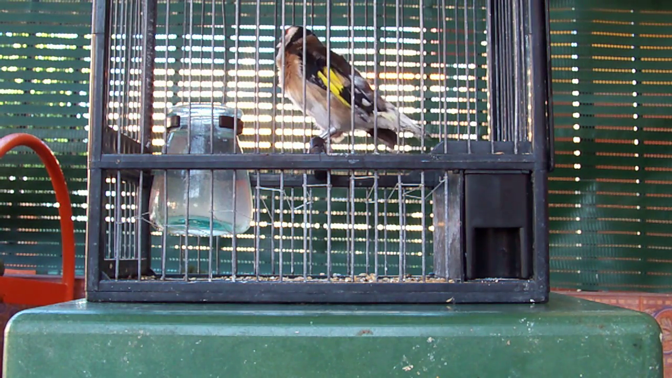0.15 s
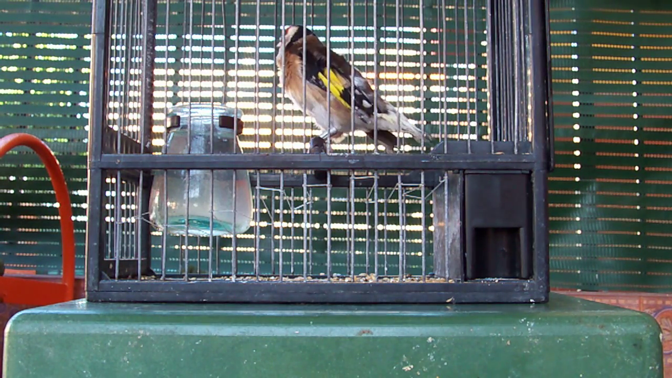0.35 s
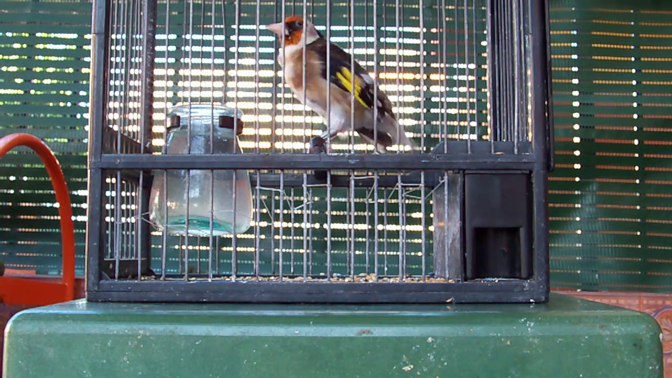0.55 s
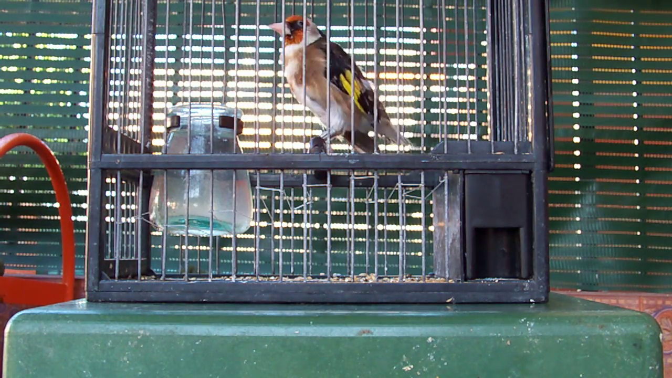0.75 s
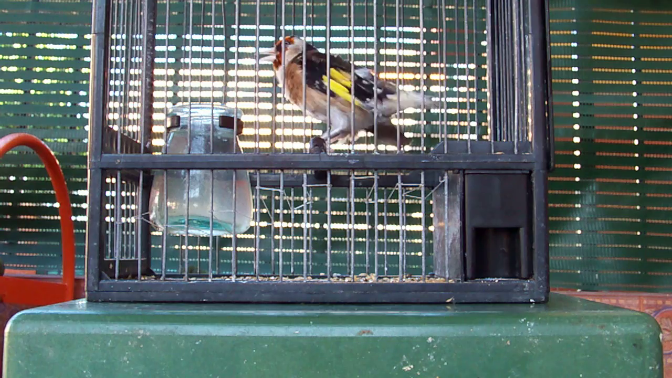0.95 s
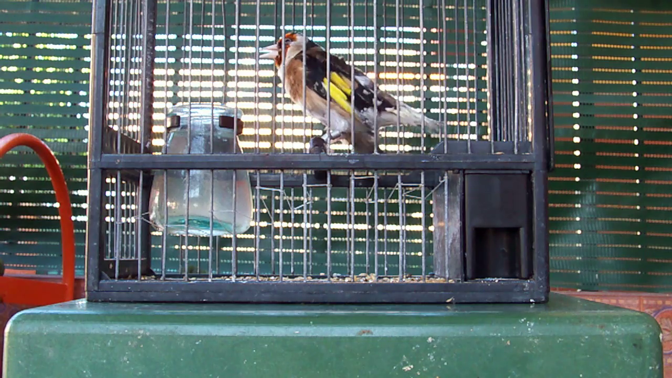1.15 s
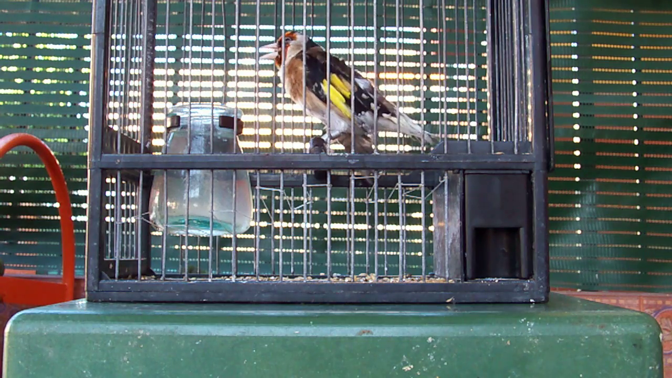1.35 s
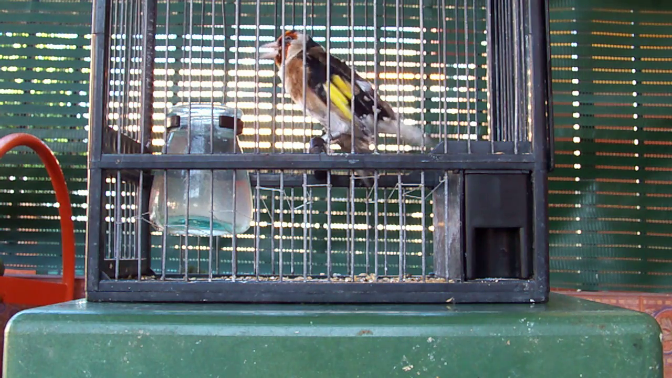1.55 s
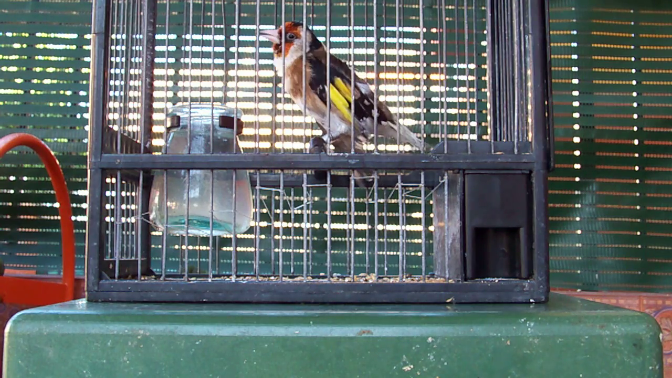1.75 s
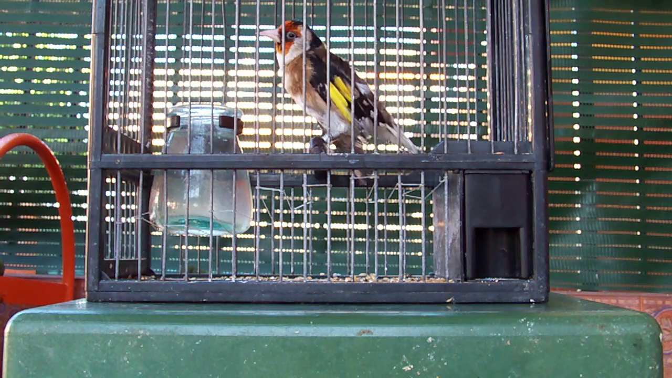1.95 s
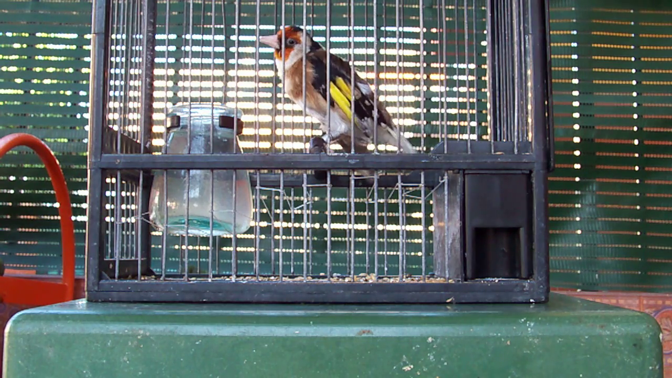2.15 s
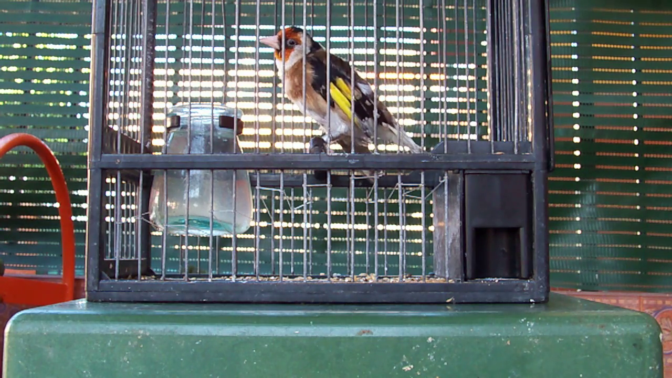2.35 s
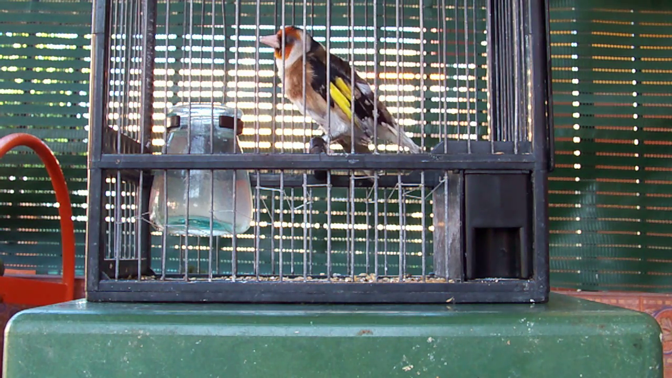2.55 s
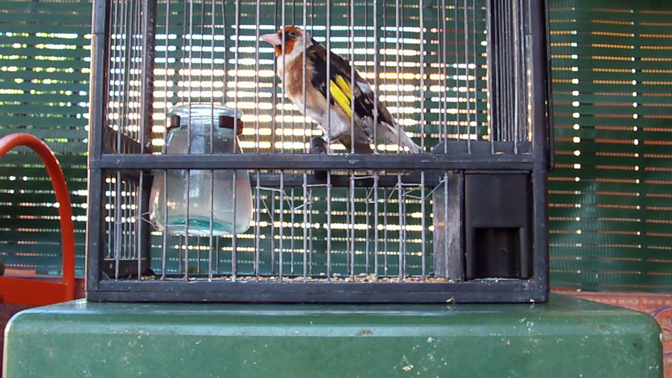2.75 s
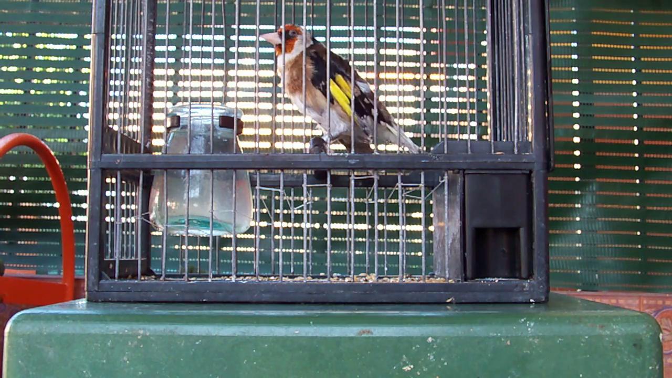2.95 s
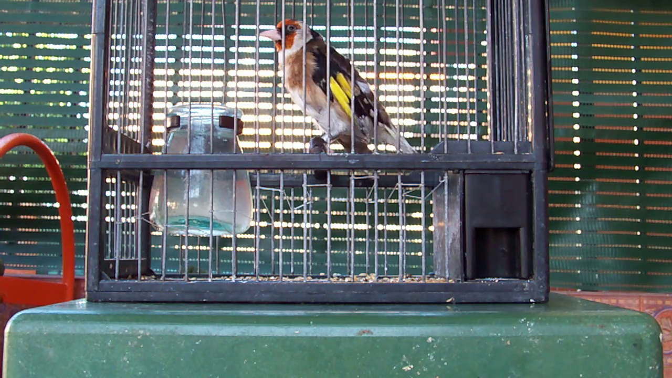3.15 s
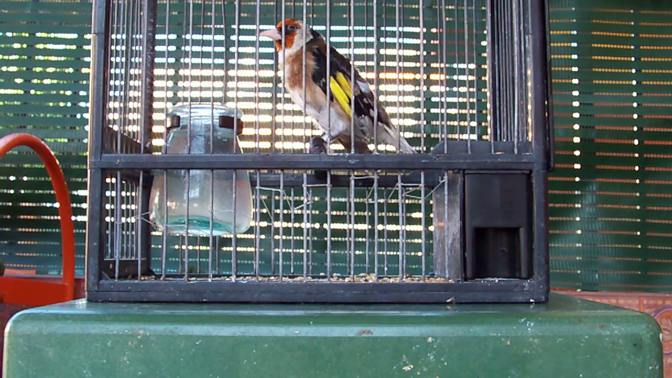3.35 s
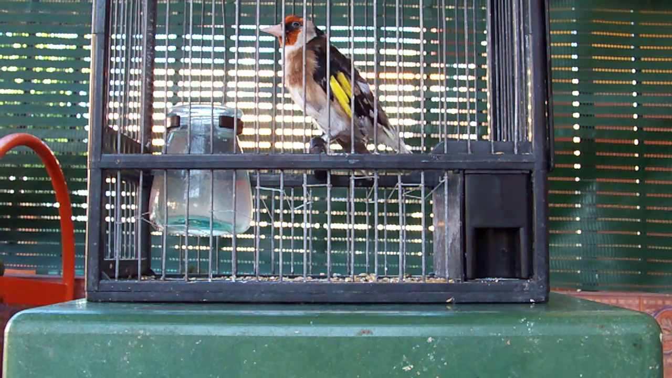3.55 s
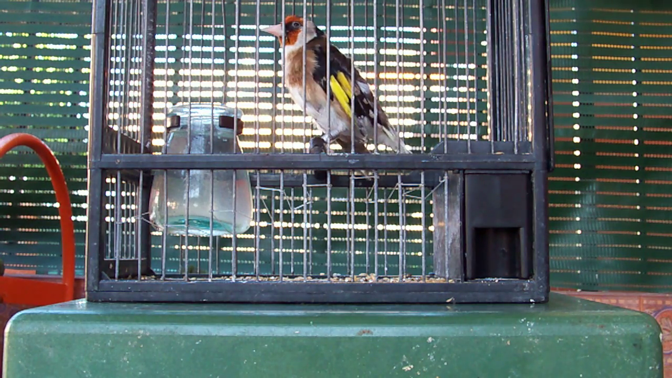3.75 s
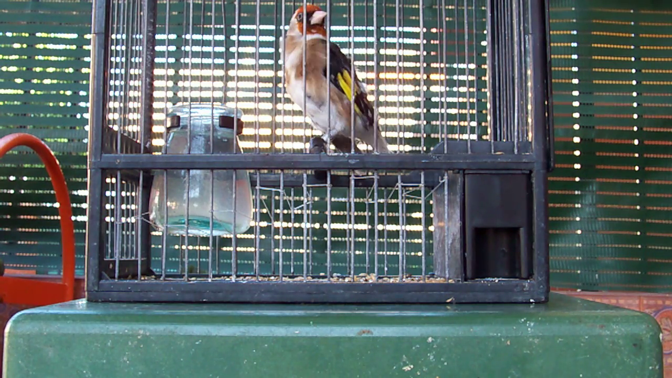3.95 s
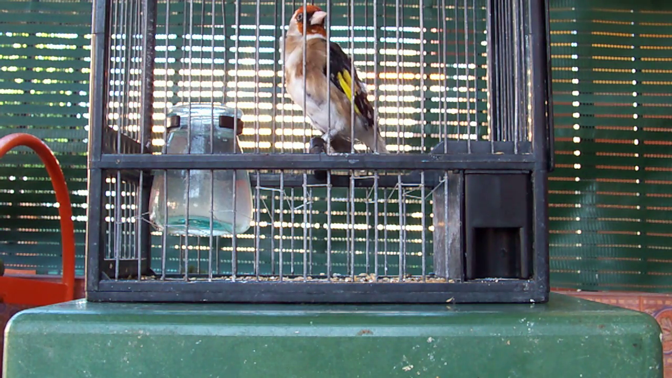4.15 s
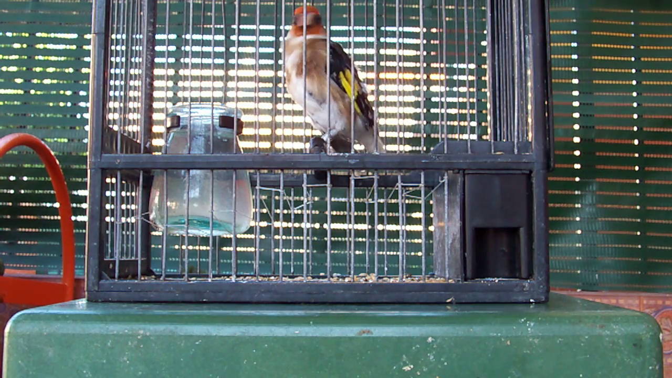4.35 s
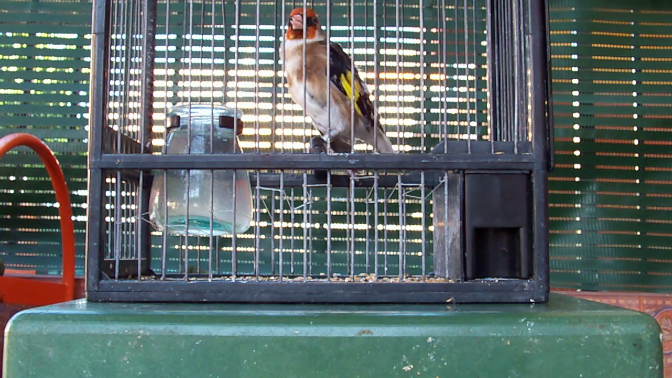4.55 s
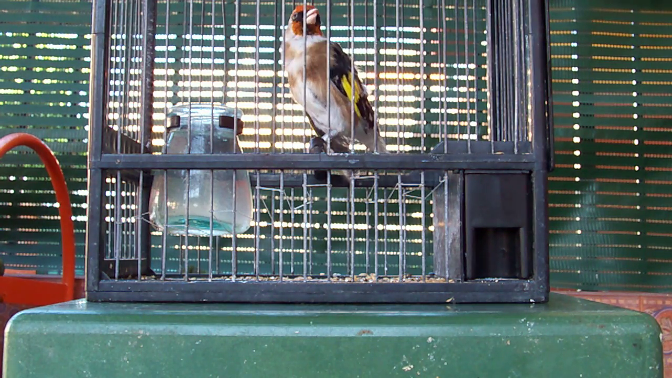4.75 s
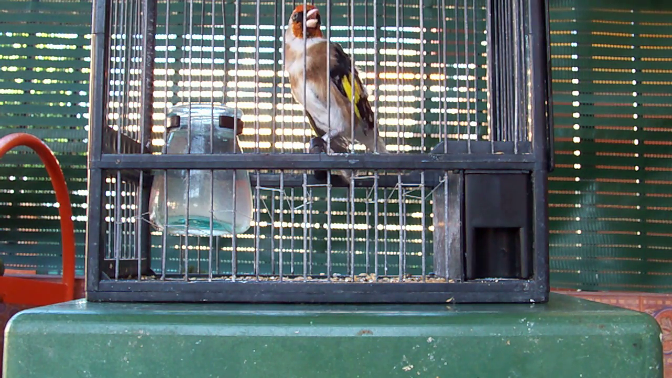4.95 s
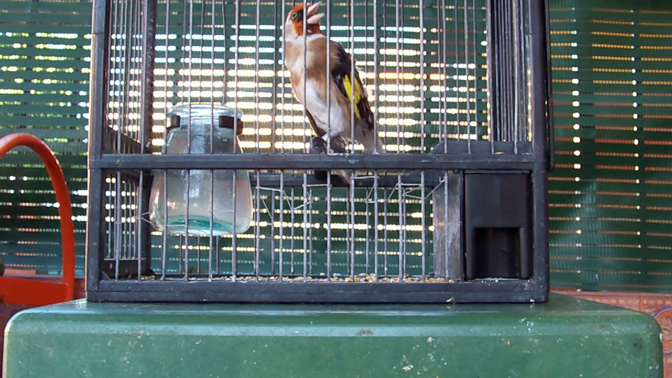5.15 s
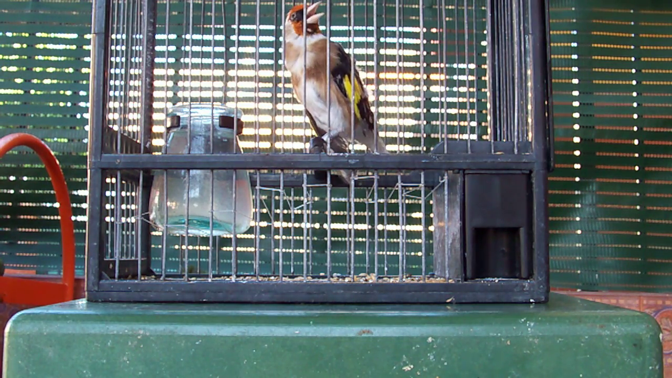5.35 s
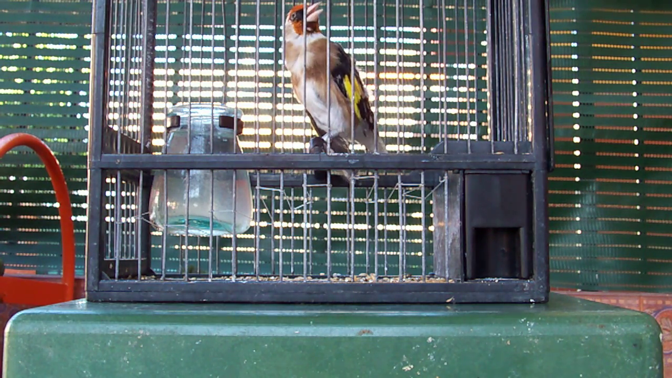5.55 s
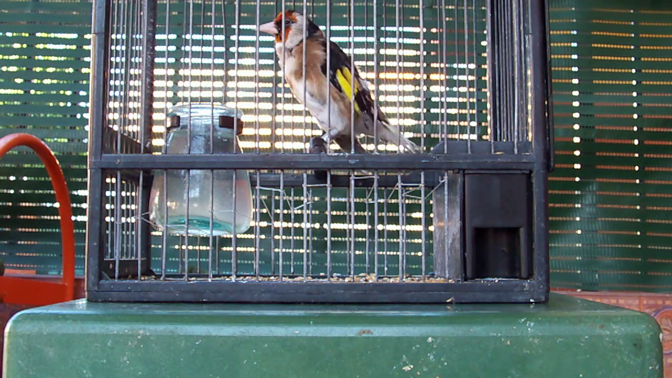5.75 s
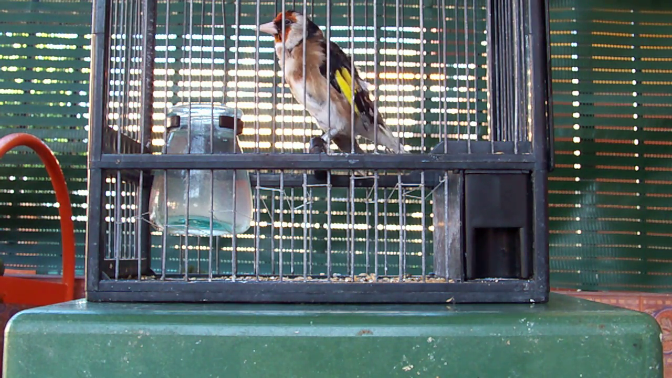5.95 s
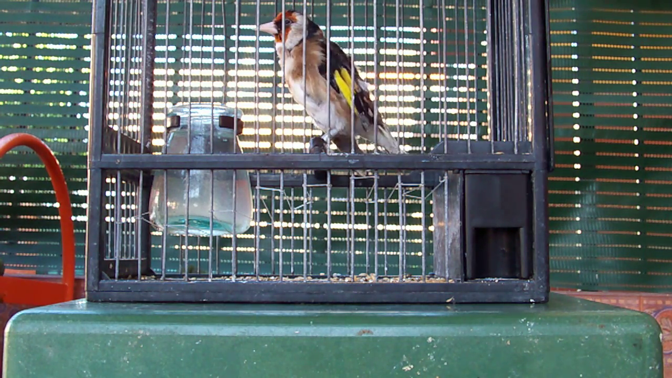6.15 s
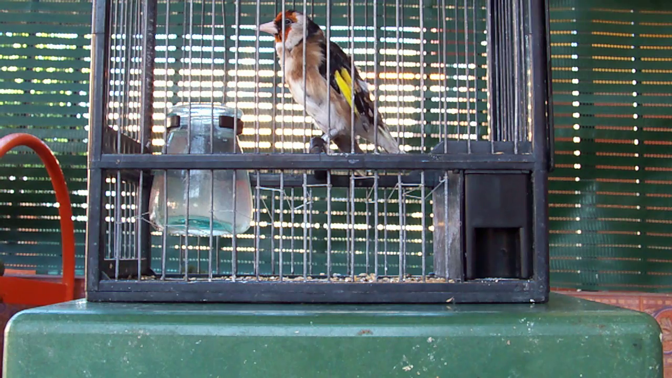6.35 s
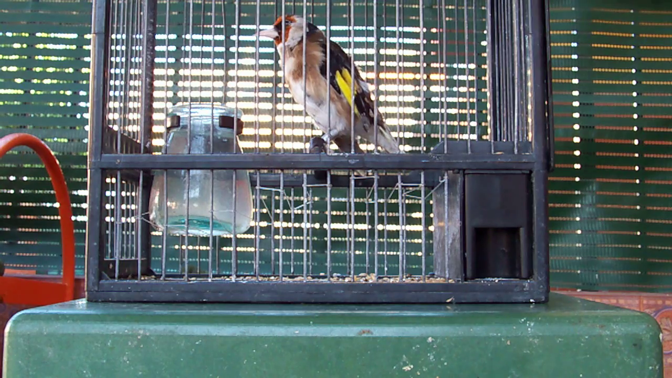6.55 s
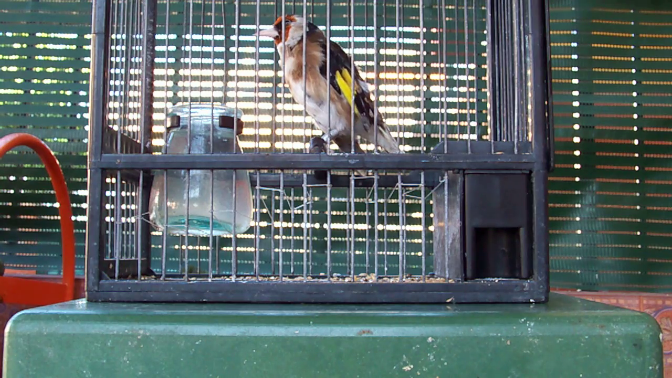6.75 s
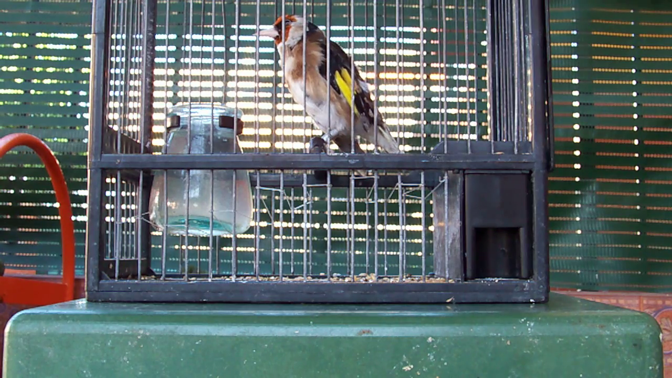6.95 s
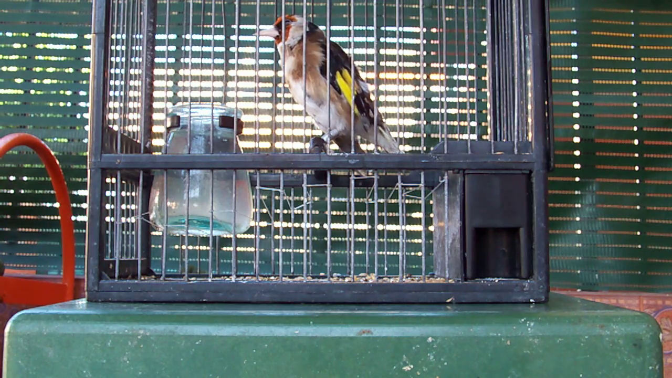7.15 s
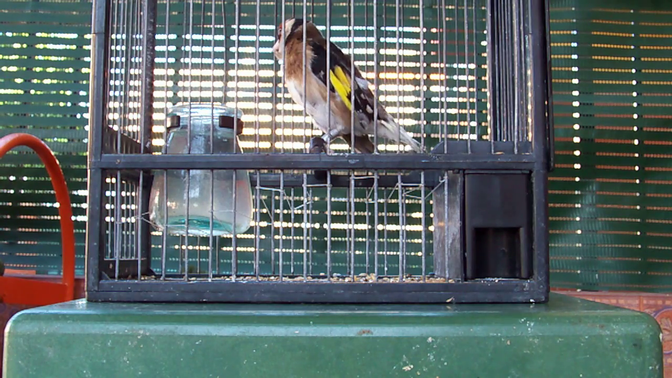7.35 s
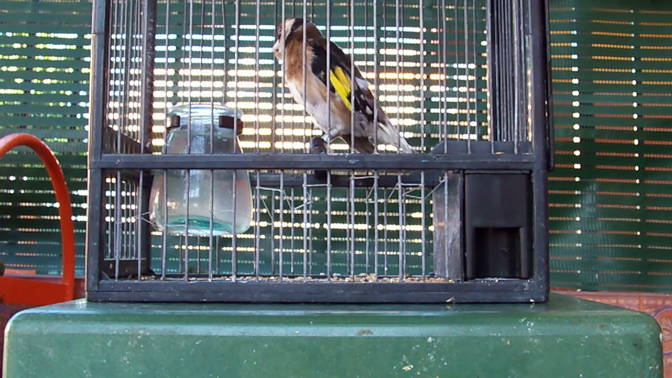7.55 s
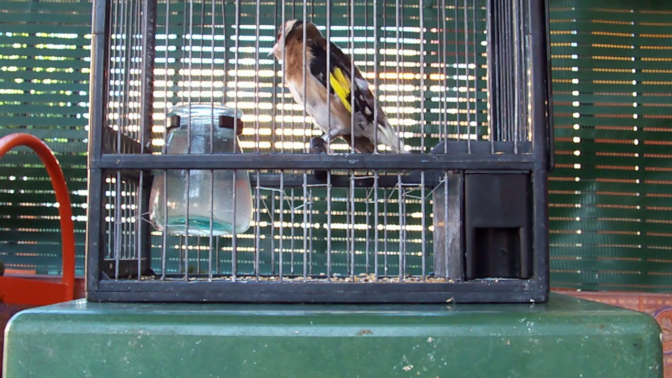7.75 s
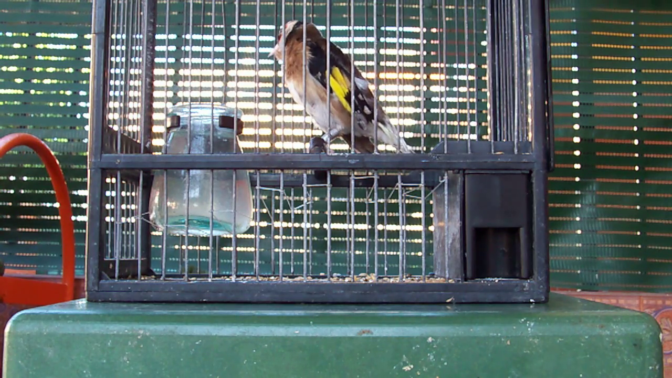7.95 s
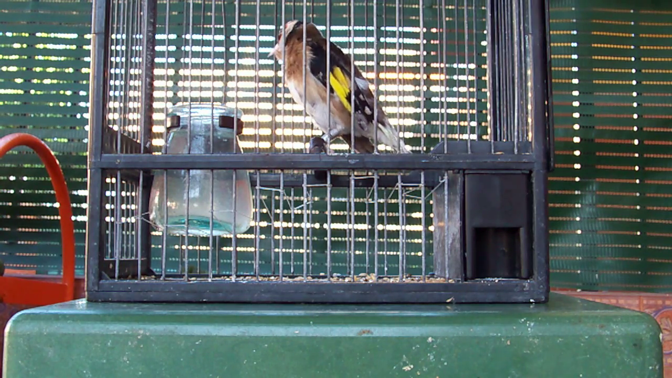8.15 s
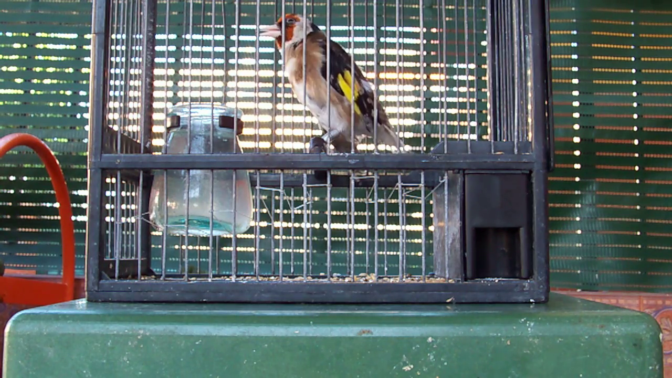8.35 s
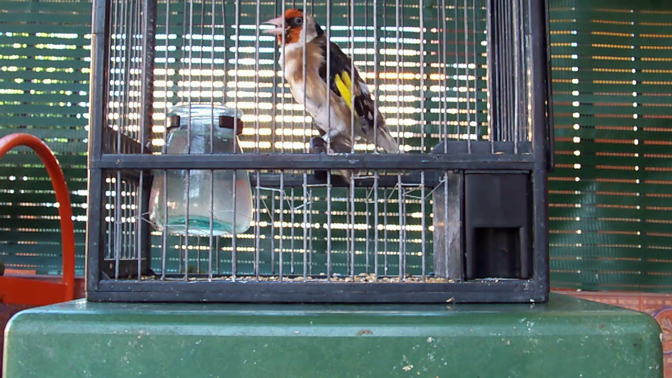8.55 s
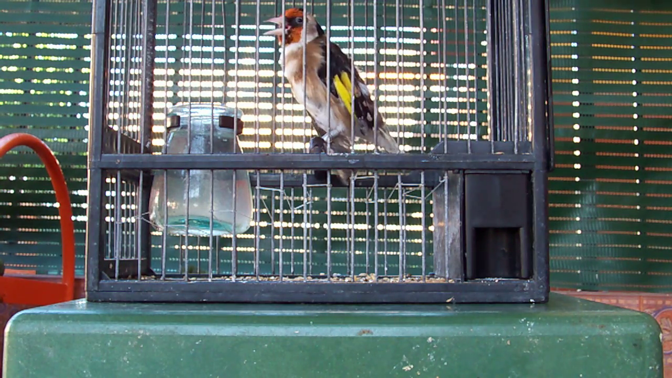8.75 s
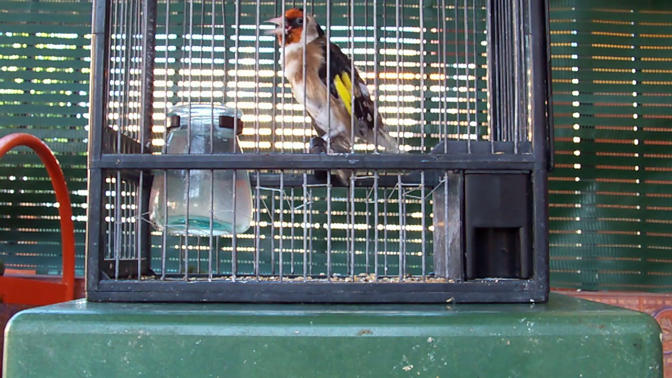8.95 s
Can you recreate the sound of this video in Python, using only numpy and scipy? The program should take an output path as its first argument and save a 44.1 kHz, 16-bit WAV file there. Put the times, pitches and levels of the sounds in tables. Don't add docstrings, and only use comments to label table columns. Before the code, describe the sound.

A low, soft hum of distant traffic and a fan runs throughout, its deepest rumble swelling slowly. From 0 to 1 s, faint far birds give rising calls and thin pipes while a dove moans low; the near finch adds tiny chips at 0.2 and 0.5 s. At 0.87 s it bursts into loud, piercing twitter until about 1.8 s: a sharp opener, then quick falling, scooping and climbing glides, about six cycles a second, mostly 3 to 8 kHz. Hard echoes and a short tail follow. From 1.8 to 3.5 s, distant pipes, a long wavering whistle and a buzzy trill end in a downward slide around 3.2 to 3.5 s. A second burst runs from 4.5 to 5.65 s, pitch sagging slightly. Quiet hum and faint dove moans fill 5.7 to 8.2 s. A third burst starts at 8.25 s and continues to the end near 9.1 s. Loud notes sound slightly gritty.

```python
import sys
import numpy as np
from scipy import signal
from scipy.fft import rfft, irfft
from scipy.io import wavfile
from scipy.ndimage import uniform_filter1d

SR = 44100
rng = np.random.default_rng(int(sys.argv[2]) if len(sys.argv) > 2 else 0)


def gain_from_db(level_db):
    decades = np.asarray(level_db, float) / 20
    return 10 ** decades


def unload_audio(sound):
    columns = np.transpose(np.atleast_2d(sound))
    steps = np.round(np.clip(columns, -1, 1) * 32767)
    wavfile.write(sys.argv[1], SR, steps.astype(np.int16))


N = 401310


def evened(x):
    return x / np.sqrt(np.mean(x ** 2) + 1e-20)


def read(points, hz):
    table_hz, value = np.transpose(points)
    return np.interp(np.log(hz + 1), np.log(table_hz + 1), value)


def add(mix, start_s, sound):
    part = mix[..., round(start_s * SR):][..., :sound.shape[-1]]
    part += sound[..., :part.shape[-1]]


def drift(count, size):
    noise = rng.standard_normal(count)
    return evened(uniform_filter1d(uniform_filter1d(noise, size), size))


def coloured(x, points):
    return irfft(rfft(x) * gain_from_db(read(points, np.fft.rfftfreq(N, 1 / SR))), N)


# pitch_hz, level_db
OCTAVE = [(2000, -6), (2300, 8), (2620, 16), (2820, 8), (2960, -20), (3400, -34), (4000, -40), (6000, -48)]
# pitch_hz, left_minus_right_db
HEAD_SHADE = [(3000, -2), (3900, 2), (4400, 2.5), (4800, -1.5), (5500, -3), (7000, -1)]
# pitch_hz, left_lead_rad
HEAD_TURN = [(0, 0), (1550, -0.06), (2760, 0.54), (3960, 0), (4220, -0.45), (4650, -1.89), (5600, -0.8),
             (5940, -1.3), (6370, -1.5), (7060, 0.5), (8100, 0.15)]
# time_s, treble_tilt_db_per_octave, room_share_db
POSTURE = [(.1, -3.7, 6), (.9, -2.35, -1), (1.1, -3.5, 4), (1.3, -3, 4.5), (1.5, -1, 5), (1.8, 0.6, 1),
           (4.5, -3.05, -1.5), (4.9, -0.36, -1), (5.2, 2, 1.5), (5.6, 0.5, -3.2), (8.3, 0.5, -0.94),
           (8.7, 2.5, 0.2), (9.1, 3.3, 2)]


def note(shape, mark_s, stretch, level_db, pitch_factor, pan_db):
    shape_s, hz, db = np.transpose(shape)
    t = np.arange(shape_s[0] * stretch, shape_s[-1] * stretch, 1 / SR) / stretch
    hz = uniform_filter1d(pitch_factor * np.interp(t, shape_s, hz), size=60, mode="nearest")
    db = uniform_filter1d(np.interp(t, shape_s, db), size=40, mode="nearest")
    db = db + level_db + 0.42 * drift(len(t), size=40)
    posture_s, tilt_db, _ = np.transpose(POSTURE)
    db = db + np.interp(mark_s, posture_s, tilt_db) * np.log2(hz / 4500)
    phase = 2 * np.pi * (np.cumsum(hz) / SR + rng.random())
    half = np.array([[.5], [-.5]])
    tone = np.sin(phase + half * read(HEAD_TURN, hz))
    octave = gain_from_db(read(OCTAVE, hz)) * np.sin(2 * phase + half * read(HEAD_TURN, 2 * hz))
    gain = gain_from_db(db + half * (pan_db + read(HEAD_SHADE, hz)))
    gain = gain * signal.windows.tukey(len(t), .12)
    return mark_s + shape_s[0] * stretch, np.sqrt(2) * gain * (tone + octave)


# time_from_mark_s, pitch_hz, level_db
OPENER = [(-.007, 5346, -36.5), (-.003, 5490, -20), (.0014, 5682, -9.5), (.005, 5950, -13.5),
          (.008, 6336, -16), (.0105, 7000, -17), (.014, 7630, -30), (.017, 8050, -41.5)]
UPPER = [(-.0028, 3800, -29.5), (-.0015, 3867, -14), (.001, 3977, -17), (.004, 4604, -20.5),
         (.007, 5214, -21.5), (.011, 5784, -24), (.021, 5980, -19.5), (.032, 5950, -21), (.04, 5900, -33.5)]
LOWER = [(.003, 3300, -30), (.0045, 3533, -17), (.0066, 3946, -10.5), (.009, 4677, -10.5),
         (.0124, 5230, -11), (.0157, 5455, -12), (.019, 5560, -13), (.0223, 5760, -18), (.026, 5920, -26.5)]
FALL = [(-.009, 7983, -39), (-.005, 7928, -30.5), (-.002, 7390, -18), (0, 7000, -11.5), (.0014, 6470, -9.5),
        (.003, 6380, -15.5), (.005, 6210, -21), (.011, 5920, -18.5), (.015, 5882, -28)]
SCOOP = [(-.004, 3456, -56), (.007, 2239, -47.5), (.0118, 2920, -28), (.0148, 3832, -15),
         (.0185, 4619, -12.5), (.024, 5163, -13.5), (.031, 5486, -11.5), (.041, 5433, -16),
         (.0445, 5380, -30.5)]
CLIMB = [(-.021, 2987, -42.5), (-.0135, 3132, -21), (-.0045, 3507, -12), (.006, 3763, -22),
         (.015, 4372, -15.5), (.0218, 4734, -9), (.029, 4460, -15), (.034, 4456, -15), (.0375, 4430, -28.5)]
# mark_s, level_db
CHIPS = [
    (0.164, -32.5),
    (0.181, -32),
    (.467, -27.5),
]
# mark_s, stretch, level_db, left_minus_right_db
OPENERS = [
    (0.8712, 0.89, 0.5, -2.5),
    (4.5228, 0.88, 0.5, -1),
    (8.2505, 0.89, -4, -1),
]
PAIRS = [
    (0.9409, 1.07, -1.9, -0.8),
    (4.5916, 1.0, 1.1, -0.9),
    (8.3213, 1.0, -2.2, -1.4),
]
# mark_s, level_db, left_minus_right_db
FALLS = [(1.0254, -1.1, -5.5), (1.1875, 0.8, -1.5), (1.3476, -0.3, -2.5), (1.5103, -0.5, -2.5),
         (1.6775, -0.4, -0.2), (4.6765, 1.9, 1.9), (4.8385, 1.9, 0.6), (5.0008, 0.6, 5), (5.1646, 0.54, -1),
         (5.3286, 0.56, -0.5), (5.5086, 0.5, -3), (8.4095, -1.3, -7), (8.5746, -1.55, -5.5),
         (8.7369, -2.1, -7), (8.9016, -0.9, -5.5), (9.068, -2.5, -7.5)]
SCOOPS = [(1.0266, -1.1, 2.7), (1.1931, -1.6, 2.278), (1.3536, -2.14, 5.5), (1.516, -2.9, 6.9),
          (1.6825, -2.3, 7.5), (4.6779, -1.2, 5.5), (4.8432, 0.5, 3.446), (5.006, -0.17, 6.3),
          (5.1707, -2.45, 8.2), (5.3335, -0.9, 5.4), (5.5141, 1.5, 1.5), (8.4122, -1.76, 5.7),
          (8.578, 0.95, 2.5), (8.743, 0.5, 3.8), (8.9046, 0.2, 4.6), (9.0724, -1.7, 5)]
CLIMBS = [(1.113, -2, 2.8), (1.273, -2, 3.3), (1.4358, -2, 3.5), (1.601, -1.2, 4.5), (1.766, -2.5, 4.1),
          (4.764, 1, 8), (4.9271, 1.2, 5.9), (5.0902, 0.4, 6), (5.2525, -0.54, 8.5), (5.418, -0.5, 6.7),
          (5.5978, -0.3, 6), (8.4987, 1.5, 3.8), (8.6607, 1.5, 3.4), (8.8264, 0.38, 5.8),
          (8.992, -0.46, 6.6)]
# first_s, fall_stretch, scoop_stretch, climb_stretch
BURSTS = [
    (.87, 1.08, .97, 0.99),
    (4.52, 1.1, .99, 0.98),
    (8.25, 0.84, 1.01, .98),
]
SYLLABLES = [(.99, 1.02, 1.005), (.99, 1.004, .996), (1.005, .998, 1.001), (1.001, 1.002, .988),
             (1.001, .998, .977), (.985, .992, .971)]
SYLLABLE_S, OPENING_S = .1635, .13
FIRST_SCOOP_STRETCH = 1.1


def finch():
    out = np.zeros((2, N))
    for mark_s, level_db in CHIPS:
        add(out, *note(OPENER, mark_s, .74, level_db, pitch_factor=.93, pan_db=0))
    for shape, rows, factor in [(OPENER, OPENERS, .99), (UPPER, PAIRS, 1.015), (LOWER, PAIRS, 1.015)]:
        for mark_s, stretch, level_db, pan_db in rows:
            add(out, *note(shape, mark_s, stretch, level_db, factor, pan_db))
    for k, (shape, rows) in enumerate([(FALL, FALLS), (SCOOP, SCOOPS), (CLIMB, CLIMBS)]):
        for mark_s, level_db, pan_db in rows:
            first_s, *stretches = [burst for burst in BURSTS if burst[0] < mark_s][-1]
            syllable = int((mark_s - first_s - OPENING_S) / SYLLABLE_S)
            stretch = stretches[k]
            if shape is SCOOP and syllable == 0:
                stretch = FIRST_SCOOP_STRETCH * stretch
            add(out, *note(shape, mark_s, stretch, level_db, SYLLABLES[syllable][k], pan_db))
    return out


# delay_s, left_db, right_db
ECHOES = [(.0011, -23.5, -15.5), (.0023, -16.5, -21), (.0042, -14.5, -16), (.0068, -17.5, -14),
          (0.0103, -13, -15.5)]


def echoes(x):
    out = np.zeros((2, N))
    for delay_s, left_db, right_db in ECHOES:
        add(out[0], delay_s, gain_from_db(left_db) * x)
        add(out[1], 1.2 * delay_s, gain_from_db(right_db) * x)
    return out


# band_hz, t60_s
ROOM = [(500, 0.7), (2500, 0.09), (3400, .34), (4500, 0.37), (7000, 0.26), (9000, 0.33)]


def room(x, gap_s):
    out = np.zeros((2, N))
    tap_s = np.arange(SR // 2) / SR
    for k in range(3):
        taps = rng.standard_normal((2, SR // 2)) * np.clip(tap_s / gap_s - 1, 0, 1)
        hz, t, z = signal.stft(taps, SR, nperseg=256)
        decay = gain_from_db(-60 * t / read(ROOM, hz)[:, None])
        tail = signal.istft(z * decay, SR, nperseg=256)[1]
        tail = tail / np.linalg.norm(tail[0])
        share = np.sqrt(2 / 3) * np.cos(2 * np.pi * (1.3 * np.arange(N) / SR + k / 3))
        out += signal.fftconvolve(x * share[None], tail, axes=1)[:, :N]
    return out


PUMP_HZ, PUMP_TOP_S = 12.0, 2.757


def far_calls(rows, depth, sway, warble_hz, bead_db, flutter_db, accent_db, fade_db):
    out = np.zeros(N)
    for start_s, length_s, first_hz, last_hz, level_db in rows:
        t = np.arange(0, length_s, 1 / SR)
        beat = 2 * np.pi * warble_hz * t + .45 * drift(len(t), size=700)
        swing = np.sin(beat) * (1 + 0.55 * drift(len(t), size=300))
        pulse = np.cos(2 * np.pi * PUMP_HZ * (start_s + t - PUMP_TOP_S)) * (length_s > .2)
        hz = first_hz + (last_hz - first_hz) * (t / length_s) ** 0.98
        hz = hz * (1 + depth * swing + sway * pulse)
        db = level_db + fade_db * (.5 - t / length_s) * (length_s < .2)
        db = db + accent_db * pulse + bead_db * np.cos(beat) + flutter_db * drift(len(t), size=250)
        edges = signal.windows.tukey(len(t), min(0.022 / length_s, 1))
        add(out, start_s, np.sqrt(2) * gain_from_db(db) * edges * np.sin(2 * np.pi * np.cumsum(hz) / SR))
    return out


def repeated(first_s, gap_s, call, count):
    return [(first_s + k * gap_s, *call) for k in range(count)]


RISING = .012, .175, (.155, 4400, 4700, -61)
PIPING = .28, .174, (.135, 5660, 5690, -62.5)
LOW_PIPE = 1.795, .158, (.13, 2610, 2585, -63.5)
CHORD_TOP = 2.05, .16, (.105, 4290, 4290, -58.5)
CHORD_BASE = 2.05, .16, (.1, 3420, 3405, -66)
# start_s, length_s, first_hz, last_hz, level_db
WHISTLES = [
    (.09, .1, 5480, 5420, -68),
    (2.49, .7, 3975, 4095, -62),
    (3.15, .06, 7500, 7480, -72),
]
TRILL = [
    (2.445, .72, 5450, 5560, -57),
    (0, .99, 3650, 3610, -68),
    (1.9, .55, 5100, 5250, -67),
]
SLIDE = [
    (3.23, .11, 5850, 5500, -65),
    (3.25, .11, 4930, 4900, -57),
    (3.29, .12, 4150, 3900, -58.5),
    (3.34, .11, 3600, 3050, -59),
    (3.39, .14, 2900, 2520, -58),
]


def far_birds():
    pipes = repeated(*PIPING, count=4) + repeated(*LOW_PIPE, count=4)
    pipes += repeated(*CHORD_TOP, count=3) + repeated(*CHORD_BASE, count=3)
    out = far_calls(pipes + WHISTLES, depth=.005, sway=.001, warble_hz=36.3,
                    bead_db=8.5, flutter_db=2.4, accent_db=3.5, fade_db=8.5)
    out += far_calls(repeated(*RISING, count=5), depth=0.025, sway=.001, warble_hz=37.6,
                     bead_db=8.0, flutter_db=2, accent_db=-5.5, fade_db=10.5)
    out += far_calls(TRILL, depth=.06, sway=.012, warble_hz=82,
                     bead_db=3.5, flutter_db=2.2, accent_db=4, fade_db=0)
    out += far_calls(SLIDE, depth=.052, sway=0, warble_hz=82,
                     bead_db=3.5, flutter_db=2.2, accent_db=0, fade_db=2.5)
    return out


# start_s, length_s, first_hz, last_hz, level_db
DOVE = [(.03, .53, 530, 523, -63.5), (.45, .47, 503, 546, -63.5), (2.08, .47, 500.5, 521, -63),
        (2.5, .59, 489, 479, -67), (3.95, .47, 495.7, 509, -64.5), (6.35, .55, 522, 581, -66),
        (7.05, .63, 483, 523, -64), (7.65, .74, 532, 557, -66.5)]


def dove():
    return far_calls(DOVE, depth=0.017, sway=.001, warble_hz=5.6,
                     bead_db=2.5, flutter_db=2.0, accent_db=-2.7, fade_db=.1)


# band_hz, level_db_per_hz
HUM = [(12, -30.5), (20, -4), (93, -8.5), (117, -15), (250, -20), (299, -46.5), (331, -27.5), (521, -22),
       (654, -25.5), (706, -22.5), (956, -29.5), (1060, -26.5), (3650, -32), (6860, -38.5), (8400, -45),
       (10900, -85), (18500, -120)]
# time_s, level_db
RUMBLE = [(0, -55), (1.3, -57), (1.7, -59), (2.1, -58), (2.3, -59), (3.6, -54.5), (4.1, -57.5), (4.9, -58),
          (5.05, -64), (5.3, -56.5), (6.1, -58), (6.3, -52.5), (6.8, -54), (7.2, -53.5), (7.45, -55),
          (8.12, -48), (8.349, -56), (9.1, -59)]
# band_hz, correlation
SAME = [(25, 1), (60, 0.9), (120, 0.64), (240, 0.6), (490, 0.54), (980, 0.12), (1970, 0.9), (3960, 0.26)]


def town():
    frames, hz = N // 512 + 5, np.fft.rfftfreq(2048, 1 / SR)
    a, b, c, d, patches = rng.standard_normal((frames, 1025, 5)).T
    patches = uniform_filter1d(patches, size=14, axis=0)
    patches = evened(uniform_filter1d(patches, size=8, axis=1))
    time_s, level_db = np.transpose(RUMBLE)
    swell_db = np.interp(np.arange(frames) * 512 / SR, time_s, level_db - level_db.mean())
    swell_db = swell_db / (1 + (hz[:, None] / 75) ** 4)
    same = np.clip(read(SAME, hz), -1, 1)[:, None]
    left = a + 1j * b
    right = same * left + np.sqrt(1 - same ** 2) * (c + 1j * d)
    z = np.array([left, right]) * gain_from_db(read(HUM, hz)[:, None] + 0.3666 * patches + swell_db)
    return gain_from_db(-52) * evened(signal.istft(z, nperseg=2048, noverlap=1536)[1][:, :N])


# centre_hz, width_hz, level_db
FAN = [(91, 4, -58), (137, 8, -68)]


def fan():
    hz = np.fft.rfftfreq(N, 1 / SR)
    out = np.zeros(N)
    for centre_hz, width_hz, level_db in FAN:
        resonance = 1 + (2 * (hz - centre_hz) / width_hz) ** 2
        line = irfft(rfft(rng.standard_normal(N)) / resonance, N)
        out += gain_from_db(level_db) * evened(line)
    return out


# band_hz, level_db
ROOM_COLOUR = [(2500, 4.5), (3500, -7.5), (4500, 0), (5500, 1), (6200, 2), (7500, -5.5)]


def scene():
    near = finch()
    far = far_birds() + dove()
    posture_s, _, share_db = np.transpose(POSTURE)
    sent = near.mean(0) * gain_from_db(np.interp(np.arange(N) / SR, posture_s, share_db))
    tail = room(gain_from_db(-9.5) * coloured(sent, ROOM_COLOUR) + gain_from_db(-5.5) * far, gap_s=0.0022)
    return gain_from_db(-0.5) * near + echoes(near.mean(0)) + gain_from_db(-9.0) * far + tail + town() + fan()


def low_pass(x):
    return signal.sosfilt(signal.butter(12, 15950, fs=SR, output="sos"), x)


# band_hz, level_db
GRIT = [(100, -5), (500, -1.5), (1500, 4.5), (3000, 4.5), (7000, 2.5), (8200, -32)]
# band_hz, level_db
SHEEN = [(100, 0.5), (2000, -0.5), (8000, -0.5), (11000, -5), (16000, -3.5)]


def record(dry):
    over_db = np.maximum(20 * np.log10(abs(signal.hilbert(dry)) + 1e-9) + 3.5, 0)
    limited = dry / gain_from_db(.6 * uniform_filter1d(over_db, size=40, axis=1))
    low = signal.resample_poly(limited, 160, 441, axis=1, window=("kaiser", 9.0))
    upper = signal.lfilter(*signal.butter(4, 4400, "high", fs=16000), low)
    low = low + upper * gain_from_db(-30) * np.cos(np.pi / 2 * np.arange(low.shape[1]))
    wide = signal.resample_poly(low, up=441, down=160, axis=1, window=("kaiser", 3.1))[:, :N]
    loud = np.sqrt(abs(uniform_filter1d(wide ** 2, size=60, axis=1)))
    curve = np.diff(wide, n=2, prepend=0, append=0)
    bend = np.sqrt(abs(uniform_filter1d(curve ** 2, size=60, axis=1)))
    grit = gain_from_db(-18) * bend ** 1.374 * coloured(rng.standard_normal((2, N)), GRIT)
    sheen_gain = gain_from_db(-32.5) * loud ** 1.2 + gain_from_db(-46.0) * loud
    sheen = sheen_gain * coloured(rng.standard_normal((2, N)), SHEEN)
    hiss = gain_from_db(-82.5) * rng.standard_normal((2, N))
    return low_pass(wide + grit + sheen + hiss)


dry = scene()
out = record(dry)
unload_audio(out)
```